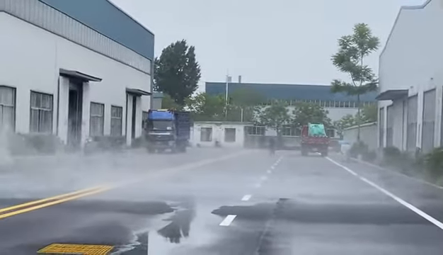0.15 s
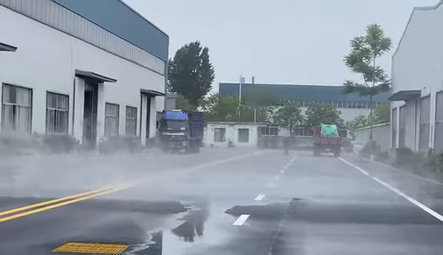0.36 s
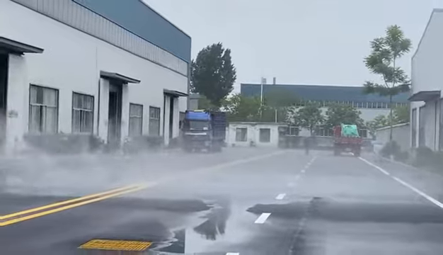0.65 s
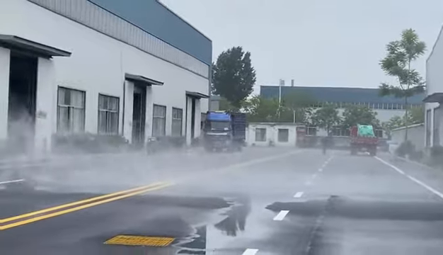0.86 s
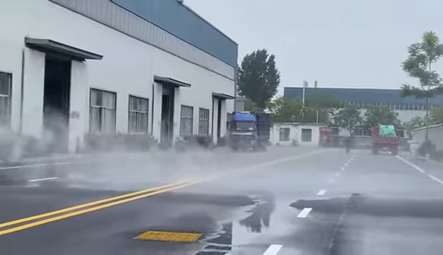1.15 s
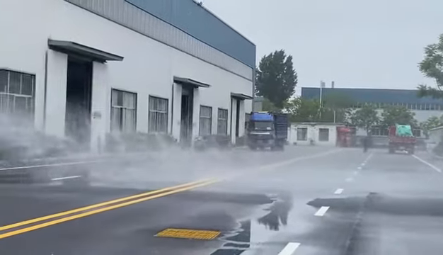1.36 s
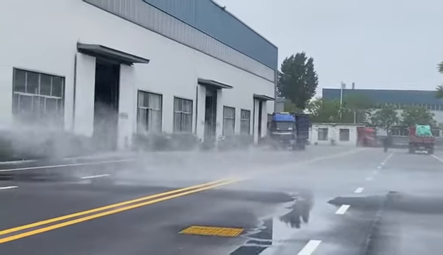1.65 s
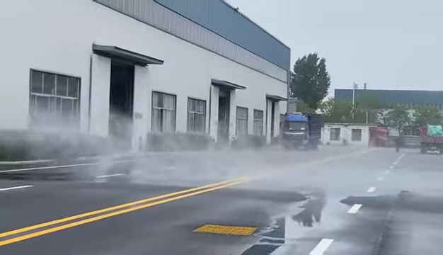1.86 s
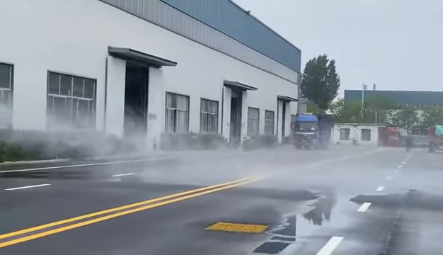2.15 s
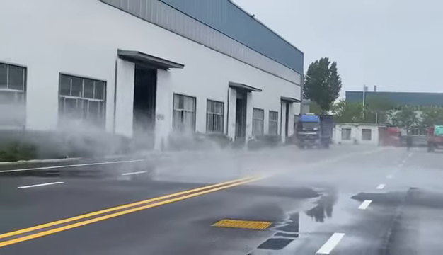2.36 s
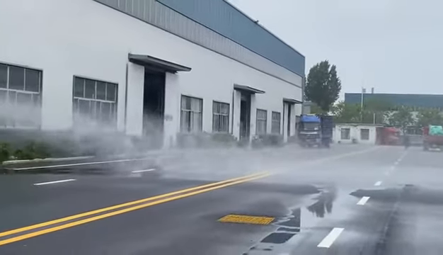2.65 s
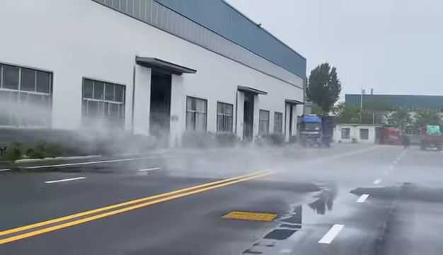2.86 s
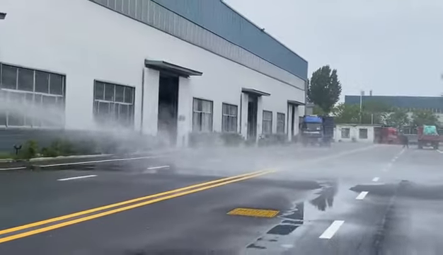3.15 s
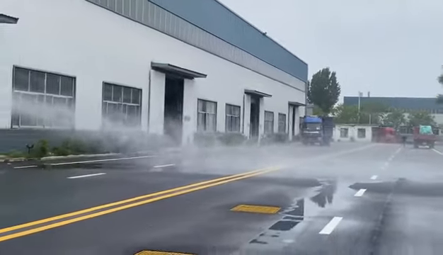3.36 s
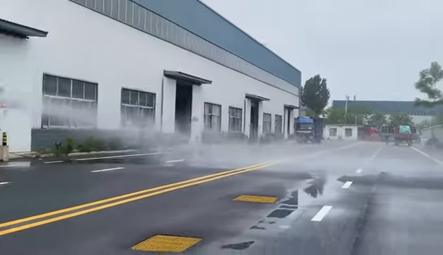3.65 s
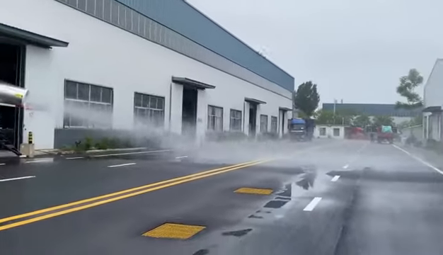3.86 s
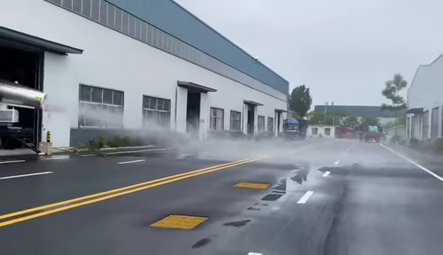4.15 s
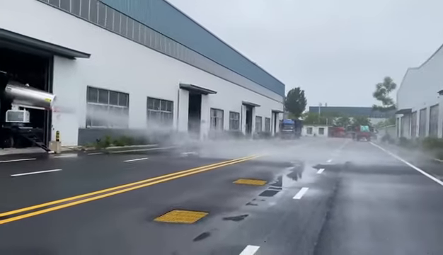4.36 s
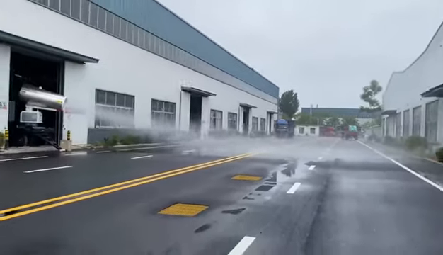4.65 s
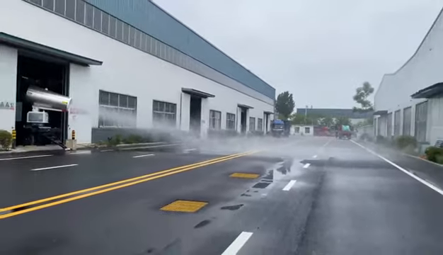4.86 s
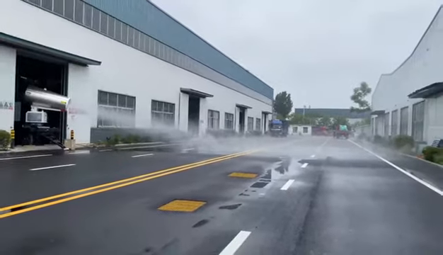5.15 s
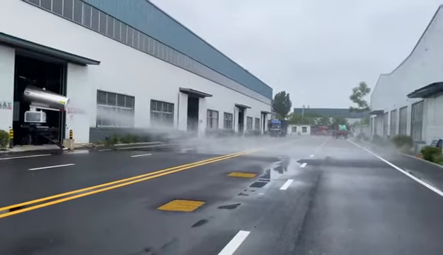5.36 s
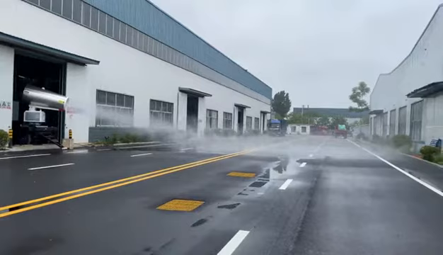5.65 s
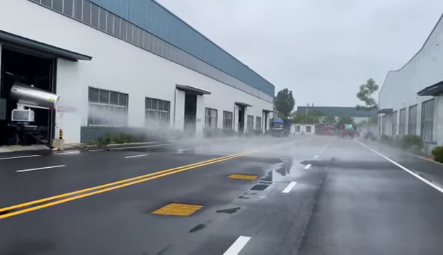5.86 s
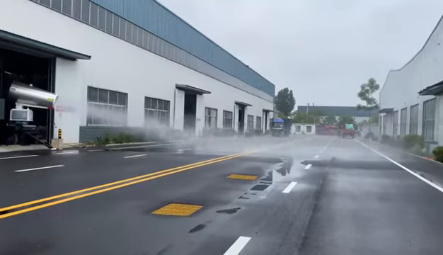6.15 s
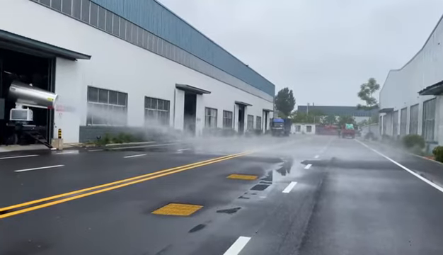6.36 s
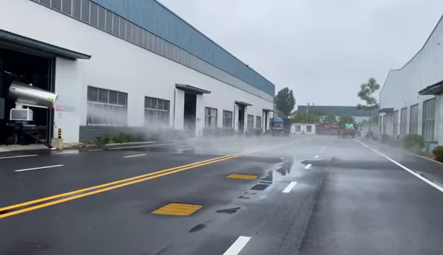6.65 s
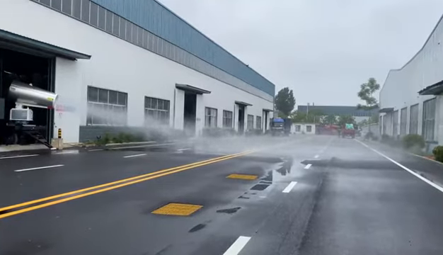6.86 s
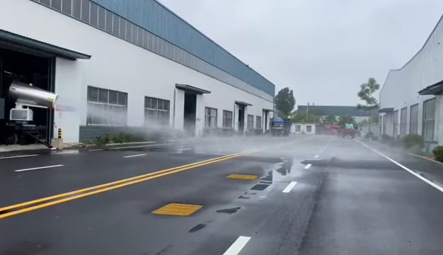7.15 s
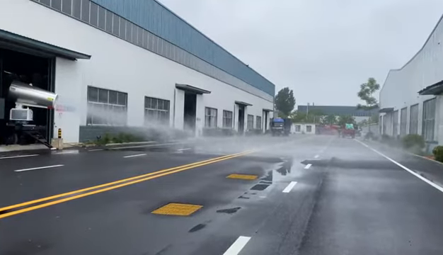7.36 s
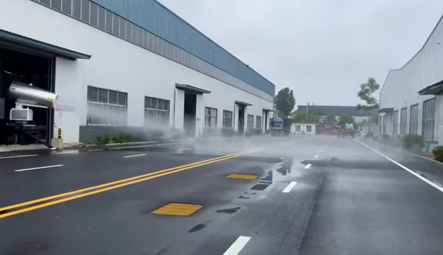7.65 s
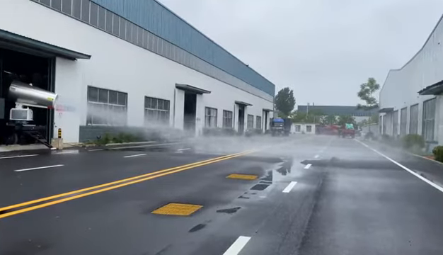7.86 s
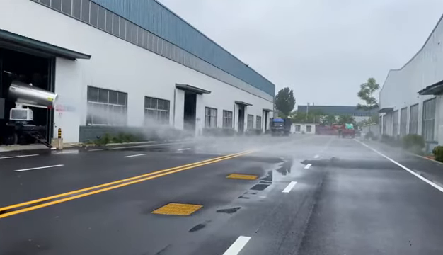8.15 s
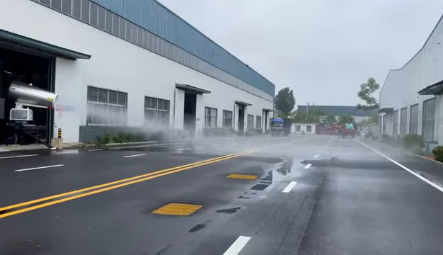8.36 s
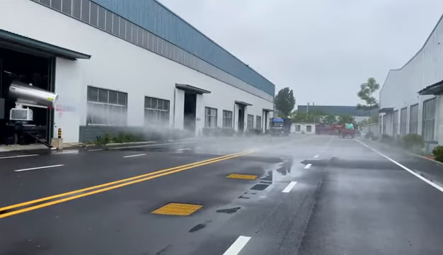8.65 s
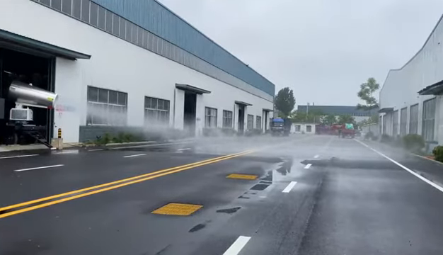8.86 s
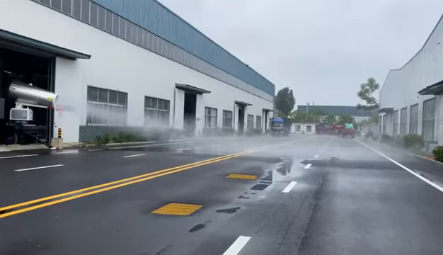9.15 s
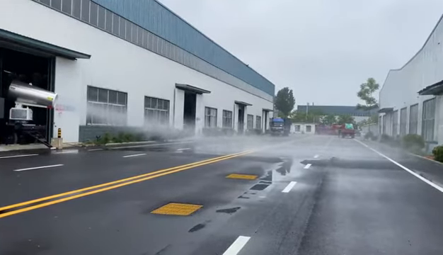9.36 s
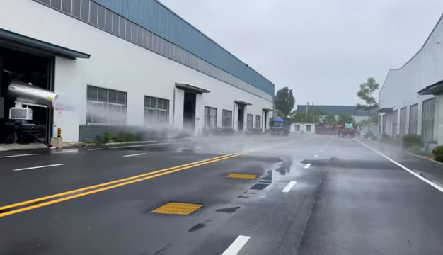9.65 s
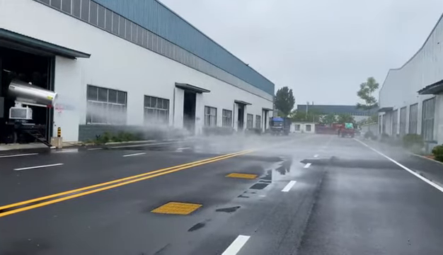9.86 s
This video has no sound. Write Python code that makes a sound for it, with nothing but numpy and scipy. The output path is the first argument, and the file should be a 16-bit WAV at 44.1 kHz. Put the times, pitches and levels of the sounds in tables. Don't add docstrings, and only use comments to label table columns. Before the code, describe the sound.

A large fan-driven mist cannon roars steadily across an open yard, low blade hum under an even spray hiss, with a faint high motor whistle.

```python
import sys
import numpy as np
from scipy import signal
from scipy.io import wavfile
from scipy.ndimage import uniform_filter1d, minimum_filter1d

SR = 44100
rng = np.random.default_rng(int(sys.argv[2]) if len(sys.argv) > 2 else 0)


def persist_wave(psi):
    counts = np.round(np.clip(psi, -1, 1) * 32767).astype(np.int16)
    wavfile.write(sys.argv[1], SR, np.atleast_2d(counts).T)


def convert_level_to_amplitude(level_db):
    exponent = np.asarray(level_db, float) / 20
    return 10 ** exponent


N = 440559
PUMP_HZ, BLADE_HZ, WHISTLE_HZ = 16.456, 257.53, 5437.15
PORT_NOTCH_HZ = 935
FRAME = 2048

# (frequency [Hz], mid [dB per Hz], side [dB per Hz], lean to left [-1..1], lag share [-1..1])
AIM_YARD = [(30, -76, -78, 0.08, 0.12), (62.3, -50.5, -64.5, -0.12, 0.27), (110, -49.5, -61, -0.04, -0.03),
            (221, -47, -59.5, -0.01, -0.12), (385, -58.5, -66, 0.17, 0.19),
            (740, -63.5, -67.5, 0.18, -0.07), (1000, -63, -66, 0.11, 0.44), (1570, -62.5, -65, 0.24, 0.27),
            (2020, -67, -64.5, -0.19, 0.19), (2390, -68.5, -70, 0.09, 0.45), (3260, -67.5, -78, 0.11, 0.16),
            (4200, -68.5, -76, 0.03, 0.11), (4870, -67, -68, 0.01, 0.02), (7300, -70.5, -76, 0.0, -0.0)]
AIM_DOOR = [(30, -68, -69.5, 0.06, -0.05), (60, -45.5, -62, -0.18, -0.08), (110, -47.5, -51, -0.01, -0.04),
            (214, -44.5, -60, -0.05, -0.17), (380, -60, -61.5, -0.03, 0.16),
            (700, -63.5, -62.5, 0.09, -0.2), (1030, -61.5, -59.5, 0.12, 0.27),
            (1480, -60.5, -63.5, 0.23, 0.19), (1910, -66, -65.5, -0.12, 0.29),
            (2380, -68, -65.5, -0.13, 0.3), (3200, -70.5, -70.5, -0.2, 0.39),
            (4240, -72.5, -71.5, -0.068, -0.12), (4870, -70.5, -73, 0.12, -0.22),
            (7240, -75, -76, -0.0, -0.17)]
AIM_REST = [(30, -75, -73.5, 0.03, -0.066), (64, -51.5, -62.5, -0.17, 0.11), (110, -49.5, -60, 0.06, -0.03),
            (224, -47.5, -57, -0.05, -0.05), (379, -58.5, -62.5, 0.17, 0.09),
            (700, -60.5, -60, 0.012, -0.02), (950, -59, -58, 0.39, 0.23), (1604, -62.5, -61, 0.48, 0.63),
            (2030, -66.5, -62, 0.062, 0.22), (2460, -67.5, -66, -0.15, 0.18),
            (3240, -69, -68.5, 0.032, 0.2), (4150, -71, -71, 0.26, -0.19), (4630, -70, -69, 0.13, -0.15),
            (6600, -71, -72.5, -0.044, -0.17)]
# (start [s], end [s])
TURNS = [
    (3.45, 3.95),
    (5.8, 5.91),
]
# (frequency [Hz], width [Hz], level [dB])
BLAST_SHAPE = [(27, 12, 6.5), (47.6, 24, -4.5), (132, 12, -6.5), (140, 30, 0.5), (170, 44, 0.5),
               (214, 17.6, -9.5), (340, 22, 0.5), (519, 105, 5.5), (571.5, 7.6, -11), (595, 25, 3),
               (1090, 190, 1.5), (3540, 1300, 1), (4900, 880, -3.5), (4020, 350, 0.5), (4500, 360, -1),
               (5500, 380, 0)]
# (time [s], length [s], level [dB])
HISS_SWELLS = [
    (2.2, 0.43, -2.5),
    (5.65, 0.32, 4),
    (7.8, 0.54, 2),
    (3.6, .8, 1),
    (9.6, .5, -1),
]
# (time [s], level [dB])
BLADE_COURSE = [(0, -28.5), (1.5, -24), (2.2, -24.5), (3.6, -25), (4.2, -24.5), (4.85, -23), (5.0, -27.5),
                (7.5, -30), (7.7, -31.5), (9.99, -30.5)]
# (time [s], length [s], level [dB])
BLADE_BEATS = [(1.0, .25, -2.5), (1.72, 0.23, -12), (1.982, 0.45, -5.5), (2.4, 0.26, 4.5),
               (2.998, 0.18, 0.5), (3.22, 0.27, 4), (3.95, 0.28, -3), (4.95, 0.076, -10),
               (5.637, 0.14, -10), (6.36, 0.092, -7), (6.203, 0.17, 2.5), (6.94, 0.42, -9.5),
               (7.303, 0.39, 5.5), (8.95, 0.87, -9.5), (9.603, 0.18, 0)]
# (time [s], level [dB])
SIXTH_COURSE = [(0, -49), (.8, -48), (1.0, -42), (1.4, -41), (1.8, -40.5), (2.2, -43), (3.6, -43),
                (4.9, -38), (5.85, -39.5), (6.0, -41), (9.2, -40.5), (9.99, -44)]
# (multiple [of BLADE_HZ], level [dB],
# then for each aim: left minus right [dB], lead of the right [rad])
BLADE_ORDERS = [(2, -39.5, 0.5, -1.6, 2.5, -3.9, 0.5, -1.9), (3, -43.5, -3.5, 1.0, -4.5, 1.6, -2, 2.1),
                (4, -42, 4.5, -1.7, 3.5, -2.3, 2.5, -2.9), (5, -54.5, -1, -3.1, -0.5, 1.5, -2.5, 0.5),
                (7, -56.5, 4, -1, 9, -3, 2, -7.5), (8, -52.5, -4, -4.5, -5, -2, 7, -11)]
# (multiple [of PUMP_HZ], level [dB])
PUMP_ORDERS = [(9, -44.5), (11, -44), (12, -50), (14, -40.5), (16, -38.5), (20, -45), (36, -51)]
# (time [s], level [dB])
WHISTLE_COURSE = [(0, -60), (1.4, -59), (1.9, -54), (2.02, -44), (2.12, -40), (2.22, -51), (2.35, -46),
                  (2.45, -48), (2.6, -44), (2.7, -40), (2.86, -41), (3.1, -40), (3.3, -40.5), (3.55, -41),
                  (3.8, -52), (4.65, -52), (4.8, -47.5), (5.8, -47.5), (6.0, -53), (6.57, -51),
                  (6.64, -42.5), (6.85, -44.5), (6.95, -47), (7.1, -49), (7.8, -47), (8.1, -50), (9.1, -49),
                  (9.99, -52)]
# (time [s], length [s])
WHISTLE_GAPS = [(2.655, .04), (2.07, .05), (2.17, .04), (2.835, .04), (2.885, .05), (3.0, .015),
                (3.18, .03), (3.245, .04), (3.345, .06), (3.69, .03)]
# (distance [multiples of BLADE_HZ], level [dB])
WHISTLE_SIDES = [(2, -58.5), (5, -57)]
# (time [s], level [dB])
WIND_COURSE = [(0, 3.5), (.85, 1.5), (1.0, 3.5), (1.2, 5), (1.5, 0), (1.67, 6), (1.85, 3), (2.1, -1.5),
               (2.9, -2), (4.8, -7), (5.9, -7), (6.1, -2), (9.99, -1)]
# (time [s], loss [dB])
DRY_MOMENTS = [(4.203, 3.8), (4.365, 2.8), (4.389, 3.4), (4.481, 2.8), (4.551, 2.8), (4.76, 2.5),
               (4.853, 3.0), (5.016, 2.5), (5.224, 3.0), (5.387, 4.5), (5.48, 3.7), (5.642, 3.0),
               (5.689, 3.0), (5.781, 2.4), (5.898, 3.2), (6.385, 5.4), (6.641, 2.4), (6.827, 2.6),
               (6.92, 2.9), (7.152, 3.2), (7.477, 3.1), (7.523, 3.3), (7.779, 2.8), (7.895, 5.0),
               (7.918, 2.9), (8.057, 3.1), (8.081, 3.3), (8.173, 5.4), (8.197, 4.6), (8.243, 3.1),
               (8.661, 3.2), (8.87, 2.8), (8.893, 4.4), (8.916, 3.5), (9.149, 3.1), (9.172, 3.3),
               (9.311, 6.1), (9.52, 2.3), (9.59, 3.0), (9.66, 4.4)]
# (time [s], depth [dB])
PORT_HOLES = [(4.598, 12.5), (4.621, 18.0), (4.737, 12.4), (5.132, 11.3), (5.248, 11.0), (5.433, 14.3),
              (5.99, 14.0), (6.292, 15.0), (6.339, 12.2), (6.478, 12.0), (6.502, 14.9), (6.618, 15.3),
              (6.664, 14.1), (6.827, 12.3), (6.92, 13.0), (6.99, 11.0), (7.129, 15.0), (7.221, 12.0),
              (7.523, 18.0), (7.546, 22.0), (7.57, 14.0), (7.756, 14.0), (7.779, 16.0), (7.709, 12.1),
              (7.802, 11.8), (7.988, 14.3), (8.011, 16.8), (8.034, 11.4), (8.15, 11.9), (8.173, 20.8),
              (8.197, 13.8), (8.243, 17.6), (8.359, 16.1), (8.057, 13.0), (8.545, 14.0), (8.568, 14.5),
              (8.615, 11.0), (8.754, 14.6), (8.777, 22.0), (8.8, 15.3), (8.916, 21.1), (8.94, 15.4),
              (9.056, 12.2), (9.149, 12.3), (9.311, 14.6), (9.451, 11.9), (9.729, 17.1), (9.822, 12.9),
              (9.172, 13.0), (9.334, 12.0), (9.543, 12.0), (9.868, 13.0)]


def short_spectra(x, size=FRAME):
    return signal.stft(x, SR, window="cosine", nperseg=size, noverlap=size // 2)


def join_spectra(z, size=FRAME):
    return signal.istft(z, SR, window="cosine", nperseg=size, noverlap=size // 2)[1][..., :N]


def course(table, t):
    return np.interp(t, *np.transpose(table))


def bumps(table, t):
    return sum(db * np.exp(-(2 * (t - at) / length) ** 2) for at, length, db in table)


def walk(rate):
    held = rng.standard_normal(400)
    fine = uniform_filter1d(np.repeat(held, 8), 8)
    smooth = uniform_filter1d(fine, 8)
    return 1.2 * np.interp(np.arange(N) * rate / SR, np.arange(len(fine)) / 8, smooth)


def walk_at(rate, t):
    return walk(rate)[np.minimum(t * SR, N - 1).astype(int)]


def aim(t):
    first, second = (np.interp(t, turn, [0, 1]) for turn in TURNS)
    return np.array([1 - first, first - second, second])


def aim_picture(table, hz):
    at_hz, *columns = np.transpose(table)
    return [np.interp(np.log(hz + 1), np.log(at_hz), column) for column in columns]


def spray_blast():
    hz, t, (mid_noise, side_noise) = short_spectra(rng.standard_normal((2, N)), size=2 * FRAME)
    shares = aim(t)
    pictures = np.array([aim_picture(table, hz) for table in (AIM_YARD, AIM_DOOR, AIM_REST)])
    mid_db, side_db, lean, lag = np.einsum("pcf,pt->cft", pictures, shares)

    roar_db = [1, 1, 0] @ shares - 0.19 * walk_at(4.3, t)
    hiss_db = [-2, 0.5, 0.38] @ shares - 0.67 * walk_at(2.7, t) + bumps(HISS_SWELLS, t)
    hissy = 1 / (1 + (2400 / (hz + 1)) ** 4)
    windy = 1 / (1 + (hz / 190) ** 4)
    swell_db = np.outer(1 - windy, roar_db) + np.outer(hissy, hiss_db) + np.outer(windy, wind_on_phone(t))
    shape_db = sum(db / (1 + (2 * (hz - f) / width) ** 2) for f, width, db in BLAST_SHAPE)
    gain = convert_level_to_amplitude(shape_db[:, None] + swell_db) * np.sqrt(SR / 2)

    flicker = np.clip(1 + .2 * rng.standard_normal(len(t)), 0, 3)
    notch_shape = np.exp(-(2 * (hz - PORT_NOTCH_HZ) / 170) ** 2)
    notch_db = np.outer(notch_shape, [1, -.5, -5.5] @ shares * flicker)
    mid = gain * convert_level_to_amplitude(mid_db + notch_db) * mid_noise

    link = np.clip(lean, -.7, .7) + 1j * np.clip(lag, -.7, .7)
    own = np.sqrt(1 - abs(link) ** 2)
    side = gain * convert_level_to_amplitude(side_db) * (link * mid_noise + own * side_noise)
    return join_spectra(np.array([mid + side, mid - side]), size=2 * FRAME)


def tone(hz, db, place):
    t = np.arange(N) / SR
    pan_db, lead = np.reshape(place, (3, 2)).T @ aim(t)
    phase = 2 * np.pi * (hz * t + rng.random()) + hz ** .3 * .14 * walk(9)
    level = np.sqrt(2) * convert_level_to_amplitude(db + np.array([pan_db, -pan_db]) / 2)
    return level * np.sin([phase, phase + lead])


def fan_blades():
    t = np.arange(N) / SR
    first_db = course(BLADE_COURSE, t) + bumps(BLADE_BEATS, t) + 1.1 * walk(14)
    sixth_db = course(SIXTH_COURSE, t) + walk(3.8) + 2.1 * walk(13)
    out = tone(BLADE_HZ, first_db, [-1, .15, -1, -.2, -1, .3])
    out += tone(6 * BLADE_HZ, sixth_db, [3, -.7, 1, -.5, 6, -1.8])
    for multiple, db, *place in BLADE_ORDERS:
        out += tone(multiple * BLADE_HZ, db + 3.4 * walk(10), place)
    return out


def water_pump():
    out = tone(8 * PUMP_HZ, -30.4 + .9 * walk(5.9), [1, .3, 1, .3, 1, .4])
    for multiple, db in PUMP_ORDERS:
        out += tone(multiple * PUMP_HZ, db + 1.6 * walk(3.3), [0, .2] * 3)
    return out


def motor_whistle():
    t = np.arange(N) / SR
    db = course(WHISTLE_COURSE, t) + 1.1 + .6 * walk(7.2) + 1.8 * walk(25)
    db -= sum(16 * np.exp(-(2 * (t - at) / length) ** 4) for at, length in WHISTLE_GAPS)
    out = tone(WHISTLE_HZ, db, [0, 0, 5, 2.4, 5, 2.3])
    for multiple, side_db in WHISTLE_SIDES:
        out += tone(WHISTLE_HZ + multiple * BLADE_HZ, side_db + 2.5 * walk(6), [2, .1] * 3)
    return out


def wind_on_phone(t):
    return course(WIND_COURSE, t) + 1.5 * walk_at(7, t)


def scene():
    return spray_blast() + fan_blades() + water_pump() + motor_whistle()


def thin_weak_sound(dry):
    hz, t, (left, right) = short_spectra(dry)
    pair = np.array([left + right, left - right]) / 2
    edges = np.concatenate([np.arange(0, 1300, 86), np.arange(1300, 4100, 172), np.arange(4224, 8400, 259)])
    band = np.searchsorted(edges, hz, side="right") - 1
    top = (hz > 4224)[:, None]
    power = abs(pair) ** 2 + 1e-18
    band_power = np.add.reduceat(power.sum(axis=0), np.searchsorted(hz, edges))
    band_db = 10 * np.log10(band_power / np.bincount(band)[:, None])[band]

    def listed(table):
        at, db = np.transpose(table)
        return np.bincount(np.rint(at / t[1]).astype(int), db, len(t))

    frame, patch, block = rng.standard_normal((3, len(edges), len(t)))
    patch, block = (signal.lfilter([.75], [1, -.65], v) for v in (patch, block))
    block = block[np.searchsorted(edges, 4224 + (hz - 4224) // 690 * 690) % len(edges)]
    wide = np.interp(t, [3.7, 4.4], [0, 1])

    hunger = .5 * np.minimum(frame[0], .6) + .48 * listed(DRY_MOMENTS)
    rebound = hunger - .3 * np.roll(hunger, 1) - .2 * np.roll(hunger, 2)
    near = (.6 * rebound + 1.25 * uniform_filter1d(frame, size=3, axis=0))[band]

    under_db = np.interp(hz, [100, 500, 1000, 2200, 3700, 4300, 7500],
                         [-20, -14, -7.5, -4.6, -5.5, -8.5, -8])[:, None]
    dry_db = (1.5 * near + 7 * wide * np.clip(near - .45, 0, 1)) * np.clip(hz / 3000, 0, 1)[:, None]
    dry_db += .6 * wide - wide * (abs(hz - 3600) < 600)[:, None]
    step_db = band_db + under_db + dry_db + 3 * patch[band] + 2.3 * frame[band]

    peak_db = 10 * np.log10(-minimum_filter1d(-power.sum(axis=0)[:400], size=21, axis=0))
    peak_db = peak_db[np.minimum(np.arange(len(hz)), len(peak_db) - 1)]
    step_db = np.maximum(step_db, np.where(top, peak_db - 13.5 + 2.3 * frame[band], -200))

    lost = 1 / (5.5 + np.exp(np.clip(3.6 * (10 * np.log10(power) - step_db), -30, 30)))
    empty = .6 * wide / (1 + np.exp(-2 * (step_db - band_db)))
    lost = np.maximum(lost, empty)
    muted = top / (1 + np.exp(-8 * (block + .4 * frame[0] - .15 - 4 * wide)))
    lost[1] = np.maximum(lost[1], muted)

    flutter_db = (0.37 + 0.32 * wide) * block - (1.9 + 0.064 * wide) * near
    flutter_db *= np.clip(hz / 3000 - .4, 0, 1)[:, None]
    hole_shape = np.exp(-(2 * (hz - PORT_NOTCH_HZ) / 200) ** 4)
    pair[0] *= convert_level_to_amplitude(-1.7 * np.outer(hole_shape, listed(PORT_HOLES)))
    ceiling = np.clip((7640 - hz) / 80, 0, 1)[:, None] ** 2
    mid, side = pair * convert_level_to_amplitude(-55 * lost + flutter_db) * ceiling
    return join_spectra(np.array([mid + side, mid - side]))


def roll_off(x):
    return signal.sosfilt(signal.butter(12, 8620, fs=SR, output="sos"), x)


def record(dry):
    rumble_cut = signal.butter(1, 15, "high", fs=SR, output="sos")
    mix = thin_weak_sound(signal.sosfilt(rumble_cut, dry))
    return roll_off(mix)


dry = scene()
out = record(dry)
persist_wave(out)
```